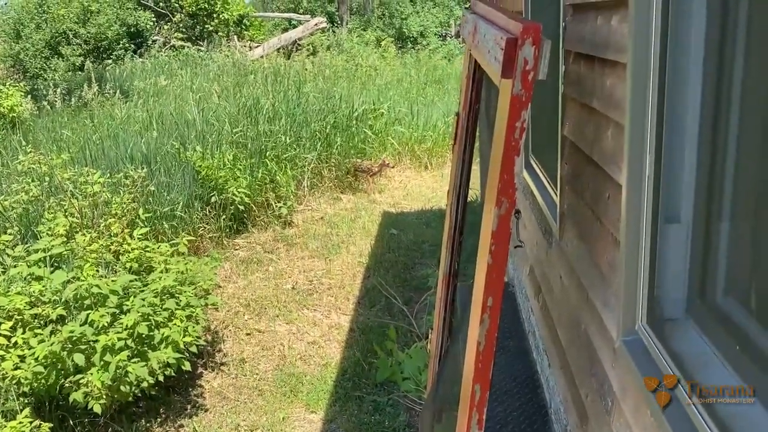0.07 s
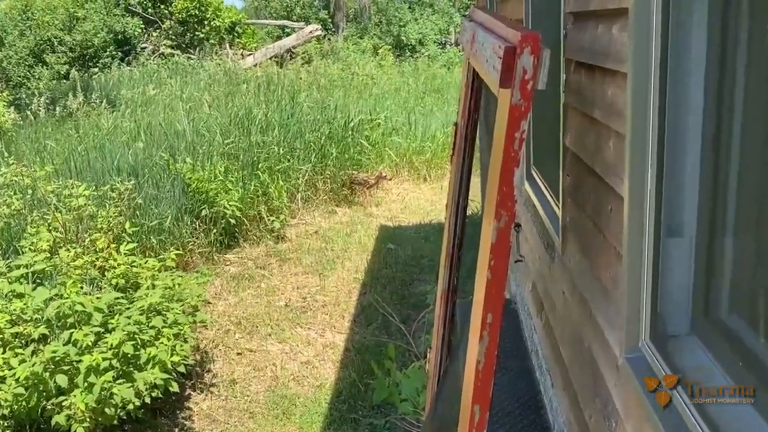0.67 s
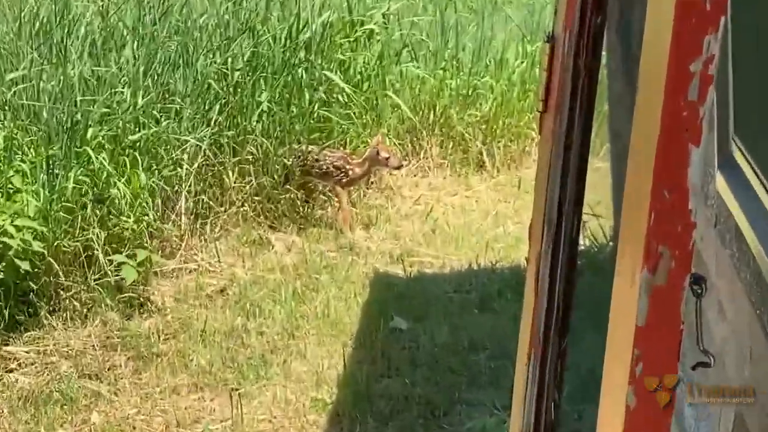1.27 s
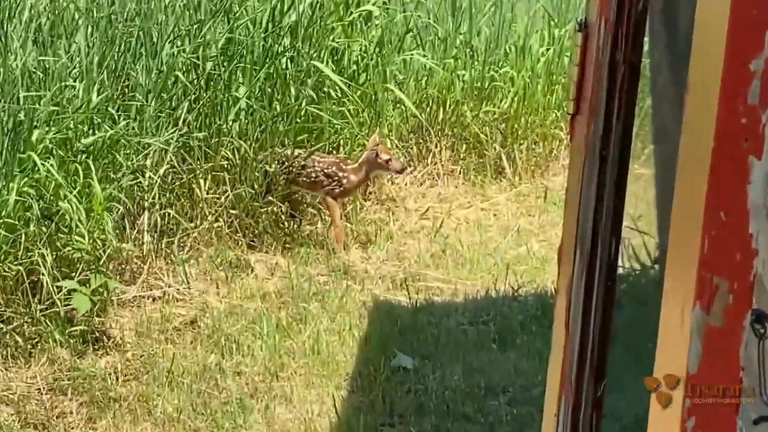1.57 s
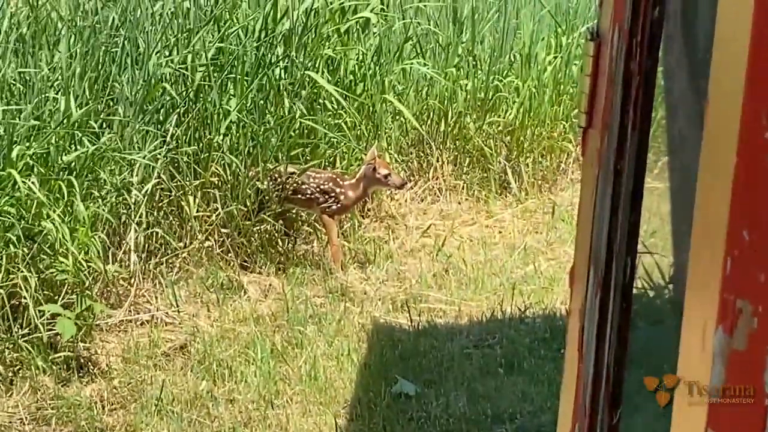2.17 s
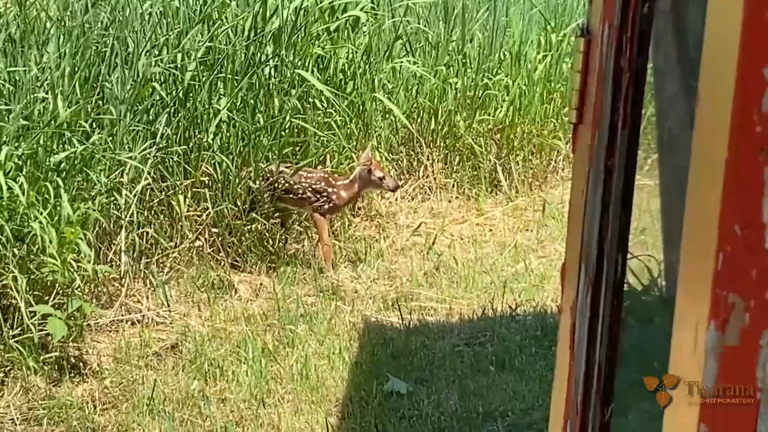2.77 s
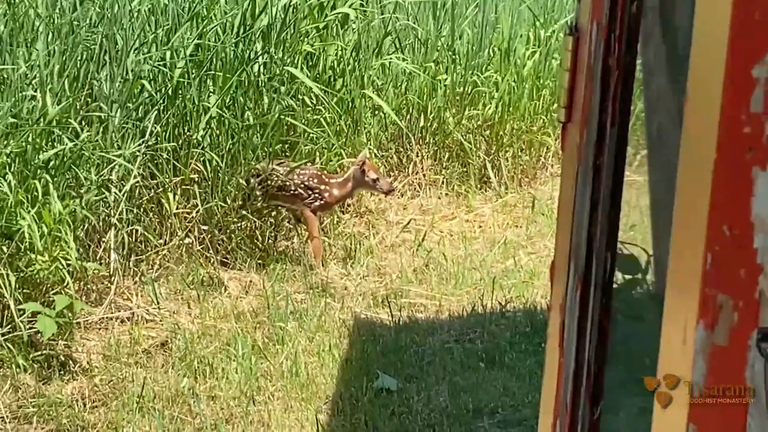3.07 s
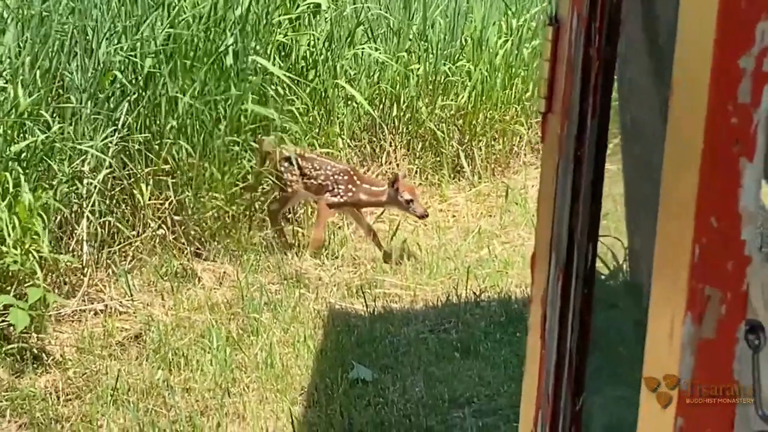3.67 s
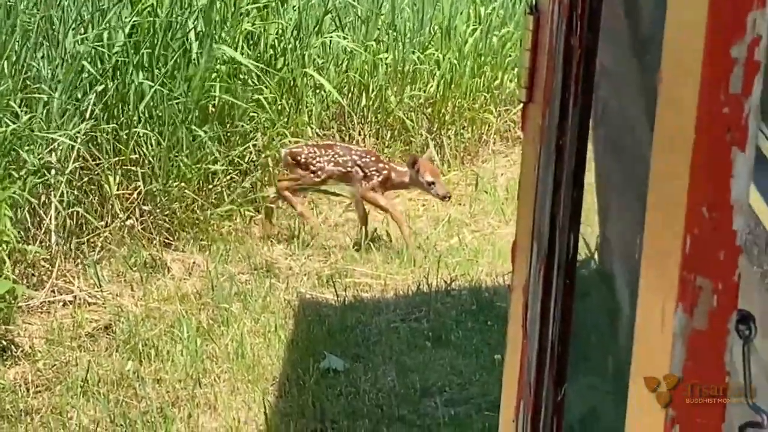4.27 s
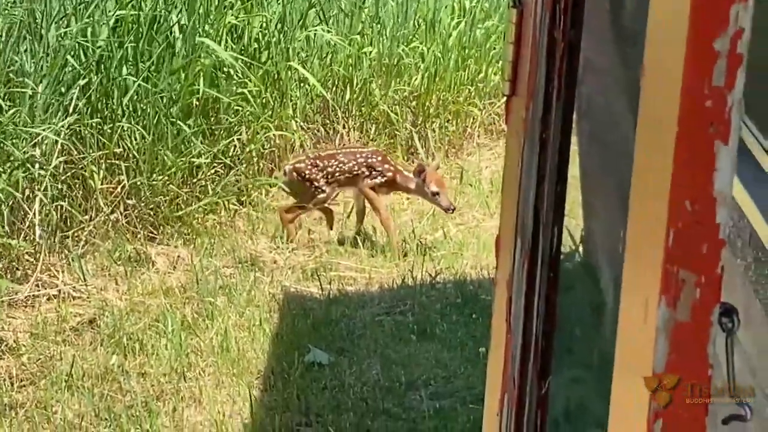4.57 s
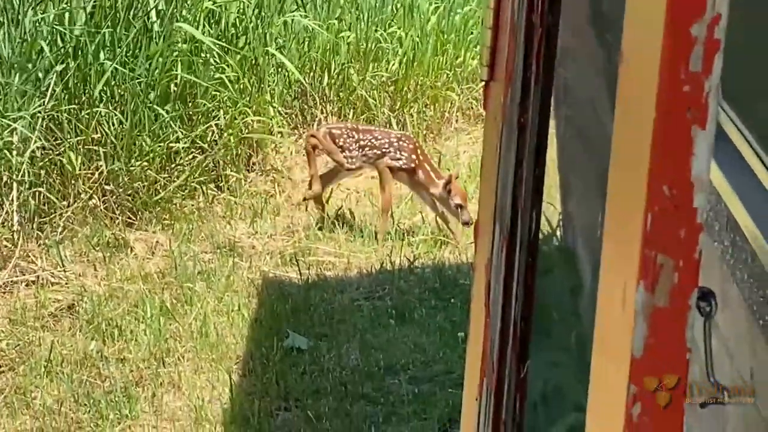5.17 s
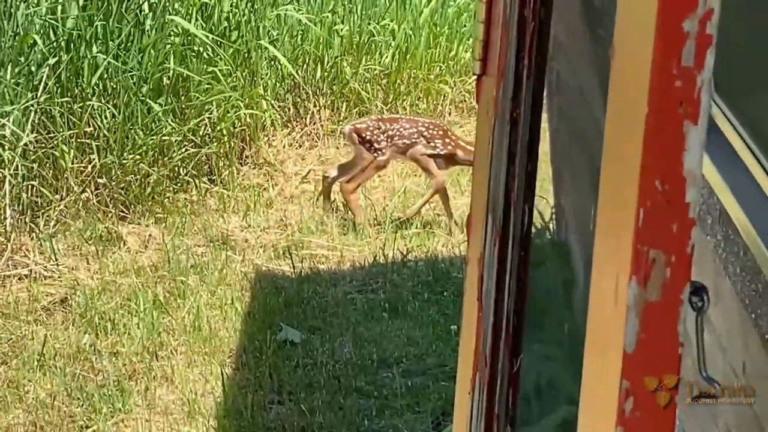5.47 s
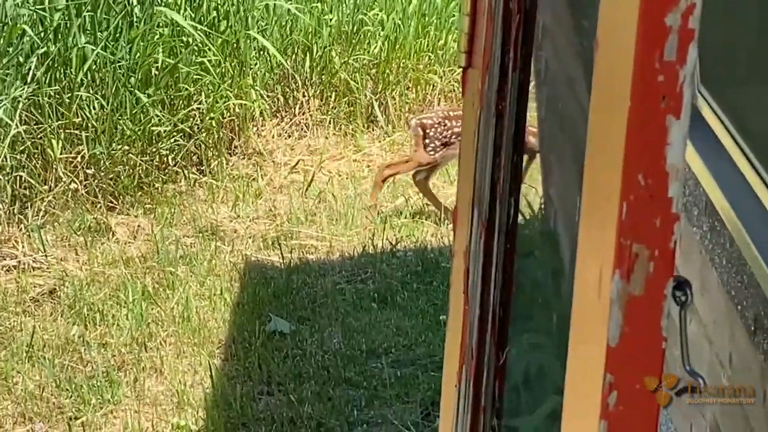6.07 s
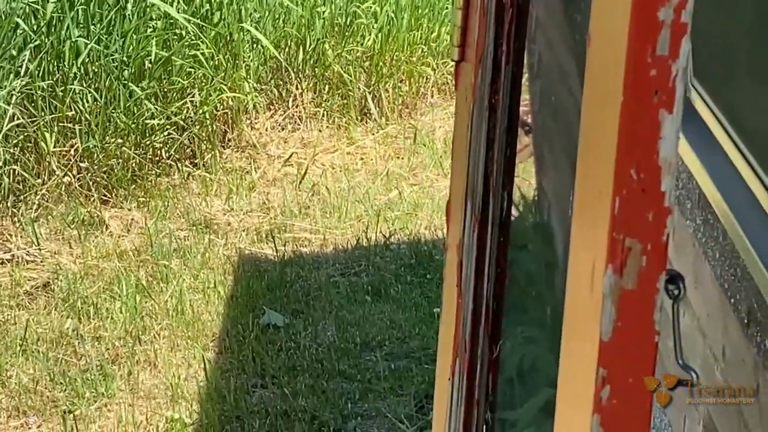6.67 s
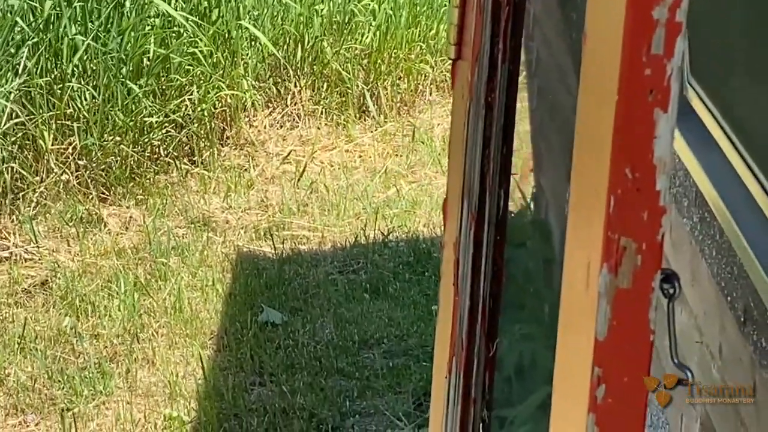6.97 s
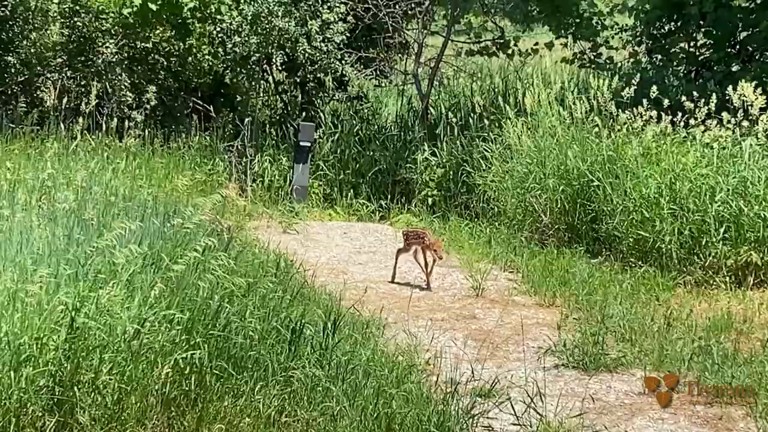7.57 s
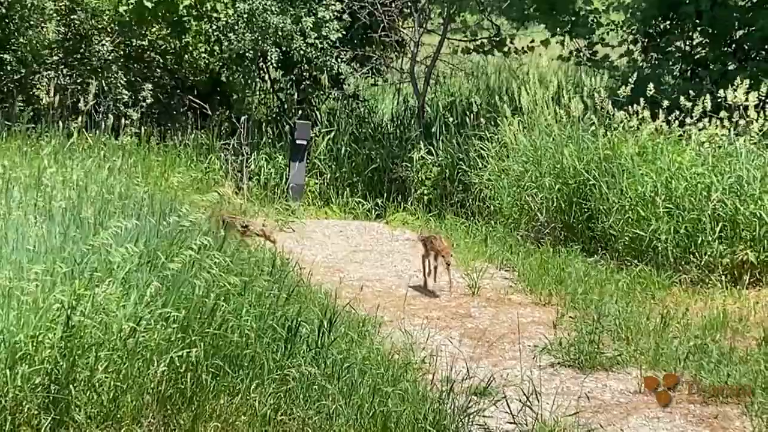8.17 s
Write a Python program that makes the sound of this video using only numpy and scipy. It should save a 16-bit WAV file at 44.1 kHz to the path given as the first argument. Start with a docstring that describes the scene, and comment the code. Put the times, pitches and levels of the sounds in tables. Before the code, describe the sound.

Quick swooping birdsong fills a meadow while light wind buffets the microphone and a fawn softly swishes through tall grass.

```python
"""A summer meadow, heard from a phone held at a house door. One small bird whistles a fast phrase of
swoops and a trill, another repeats a rise-fall-arch tune, and more call from the trees; the wall and the
leaves echo them. Light wind and handling bump the microphone, and a fawn swishes out of the tall grass.
A distant engine hums under the soft hush of open air."""
import sys
import numpy as np
from scipy import signal
from scipy.fft import rfft, irfft, next_fast_len
from scipy.io import wavfile
from scipy.ndimage import uniform_filter1d

SR = 44100
rng = np.random.default_rng(int(sys.argv[2]) if len(sys.argv) > 2 else 0)


def digitize_waveform(pressure):
    """Quantize a signal to 16-bit integers and store it at the path in sys.argv[1].

    Rows of a 2-D input are taken as channels; values are limited to [-1, 1].
    """
    field = np.atleast_2d(pressure).T
    bounded = np.clip(field, -1, 1)
    quanta = np.round(bounded * 32767).astype(np.int16)
    wavfile.write(sys.argv[1], SR, quanta)


N = 366471
TIME = np.arange(N) / SR


def undb(db):
    """Turn decibels into a number to multiply a sound by."""
    return 10 ** (np.asarray(db) / 20)


def curve(rows, t=TIME):
    """Join a table's rows with straight lines in time; gives one curve for each column after the first."""
    seconds, *columns = np.transpose(rows)
    return [np.interp(t, seconds, column) for column in columns]


def unit(x):
    """Scale a sound to an average power of 1."""
    return x / np.sqrt(np.mean(x ** 2) + 1e-18)


def add(out, start_s, sound):
    """Mix a sound in at the given time."""
    i = max(int(start_s * SR), 0)
    out[..., i:i + sound.shape[-1]] += sound[..., :max(N - i, 0)]


def wander(rate):
    """A smooth random wobble of typical size 1 that turns about `rate` times a second."""
    hold = max(int(SR / rate), 1)
    steps = np.repeat(rng.standard_normal(N // hold + 1), hold)
    return unit(uniform_filter1d(steps, hold)[:N])


def colour(x, points):
    """Set the balance of low and high tones from (Hz, dB) points, at an average power of 1."""
    hz, db = np.transpose(points)
    size = next_fast_len(N)
    f = np.fft.rfftfreq(size, 1 / SR) + 1
    gain = undb(np.interp(np.log(f), np.log(hz), db))
    return unit(irfft(rfft(x, size) * gain, size)[..., :N])


def two_mics(pair, apart_hz):
    """Two microphones close together hear low tones alike, but differ above apart_hz."""
    side = signal.sosfilt(signal.butter(1, apart_hz, "high", fs=SR, output="sos"), pair[1])
    return pair[0] + np.array([side, -side])


def swell(peak_s, db, rise_s, fall_s):
    """The power of a sound that grows to a peak and dies away."""
    t = TIME - peak_s
    width_s = np.where(t < 0, rise_s, fall_s)
    return undb(db) ** 2 * np.exp(-np.minimum((t / width_s) ** 2, 50))


def swing(hz, cycles):
    """A brief push and pull of air, in the middle of a quarter of a second."""
    t = np.arange(-SR // 8, SR // 8) / SR
    return np.exp(-(t * hz / cycles) ** 2) * np.cos(2 * np.pi * (hz * t + rng.random()))


def air():
    """The soft hush of open country, swelling slowly."""
    # Each row: time in seconds, level in dB.
    levels = [(0, -64.5), (1.5, -63.5), (3.7, -62.5), (5.5, -63), (7.5, -63), (8.31, -63)]
    # Each row: frequency in Hz, relative strength in dB.
    tone = [(20, -21), (45, -11.5), (120, 5), (220, 0), (330, -7), (600, -14), (1200, -22.5), (1700, -20.5),
            (2500, -16), (3500, -17.5), (7000, -28), (10000, -45), (15500, -49)]
    hush = colour(two_mics(rng.standard_normal((2, N)), apart_hz=640), tone)
    return hush * undb(curve(levels)[0] + 0.5 * wander(5))


def engine(waver, mic_phase):
    """A far engine's hum and fainter drones waver, fade and reach the two microphones out of step."""
    # The main hum. Each row: time in seconds, level in dB, pitch in Hz.
    hum = [(0, -56.5, 137.1), (.35, -55, 144.3), (.6, -61.5, 138.7), (1.1, -58.5, 139), (2.1, -67, 140.5),
           (3.3, -63, 139.3), (4.4, -55.5, 139), (5.2, -64.5, 140.4), (6, -82, 143.4), (7.1, -58.5, 141.9),
           (7.63, -60, 140.9)]
    # Each row: start and end in seconds, pitch in Hz, level in dB.
    drones = [(0, 7.6, 246.4, -77.5), (3.6, 6, 241.3, -70), (4.599, 6.6, 282.8, -75),
              (7.66, 8.2, 200.5, -68.5)]
    hum_db, hum_hz = curve(hum)
    tones = [(hum_hz, hum_db, TIME < hum[-1][0], mic_phase)]
    for start, end, hz, db in drones:
        on = np.clip(np.minimum(TIME - start, end - TIME) / 0.044, 0, 1)
        tones.append((hz, db, on, mic_phase / 2))
    out = 0
    for hz, db, on, shift in tones:
        phase = 2 * np.pi * np.cumsum(hz * (1 + waver * wander(22))) / SR
        loudness = np.sqrt(2) * on * undb(db + 1.5 * wander(8))
        out = out + loudness * np.sin([phase + shift, phase - shift])
    return out


def ticks():
    """Small knocks and ticks: bursts of noise, dull or bright, that die away fast."""
    # Each row: start in seconds, level in dB, centre and width of the band in Hz, fade time in seconds.
    knocks = [(0.658, -56, 400, 600, 0.015), (1.035, -58, 7000, 12000, 0.0066),
              (7.483, -58, 760, 796, 0.0075), (8.209, -69, 11100, 8000, 0.029)]
    out, t = np.zeros(N), np.arange(SR // 8) / SR
    for start, db, hz, width, fade_s in knocks:
        low = np.hypot(hz, width / 2) - width / 2
        band = signal.butter(2, [low, min(low + width, .45 * SR)], "band", fs=SR, output="sos")
        burst = unit(signal.sosfilt(band, rng.standard_normal(len(t))))
        onset = 1 - np.exp(-t * hz * 2)
        add(out, start, undb(db) * burst * onset * np.exp(-t / fade_s))
    return out


def leaves(gain_db):
    """Leaves and grass stir all round in a steady rustle."""
    # Each row: time in seconds, relative level in dB.
    levels = [(0, -82.5), (1.1, -82.5), (2.3, -77.5), (3, -77.5), (5.7, -75.5), (6.5, -78), (7.7, -78),
              (7.88, -88), (8.31, -82)]
    # Each row: frequency in Hz, relative strength in dB.
    tone = [(600, -3), (1500, -0.5), (2500, 2), (4000, 7.5), (7000, 4), (11000, 0.5), (15500, -11)]
    rustle = colour(two_mics(rng.standard_normal((2, N)), apart_hz=1500), tone)
    return rustle * undb(curve(levels)[0] + gain_db + wander(27))


def fawn_in_grass(gain_db, crackle, snaps_per_s, snap_range_db, flicker_db):
    """A fawn pushes through tall grass: blades slide in a bright hiss and snap free in tiny clicks."""
    # Each row: peak time in seconds, relative level in dB, rise and fall times in seconds.
    swishes = [(3.5, -69, 0.12, 0.058), (3.65, -67, 0.097, 0.15), (3.82, -72.5, 0.079, 0.2),
               (4.435, -64.5, 0.029, 0.021), (4.77, -75, 0.043, 0.044), (6.06, -82, 0.021, 0.021)]
    # Each row: frequency in Hz, relative strength in dB.
    tone = [(600, -12), (1500, -6.5), (2500, -1.5), (4000, 0.5), (7000, 4.5), (11000, 5), (15500, 1)]
    snapping = rng.random(N) < snaps_per_s / SR
    snap_sizes = snapping * undb(snap_range_db * np.minimum(rng.exponential(size=N), 3))
    hiss = rng.standard_normal((2, N))
    clicks = unit(snap_sizes * rng.standard_normal((2, N)))
    blades = colour(two_mics(hiss + crackle * clicks, apart_hz=1500), tone)
    movement = np.sqrt(sum(swell(*row) for row in swishes))
    return blades * movement * undb(gain_db + flicker_db * wander(45))


def wind(breeze_db, gusty_db, buffet_db, cycles, eddy_db, eddy_ratio):
    """Wind rumbles on the microphones; each buffet is a slow swing with faster, weaker swirls (eddies)."""
    # The breeze between buffets. Each row: time in seconds, relative level in dB.
    levels = [(0, -58.5), (.8, -60.5), (1.9, -38), (2.04, -67), (2.22, -51.5), (2.65, -59.5), (2.93, -48.5),
              (3.6, -50), (4.85, -39.5), (5.25, -50.5), (5.45, -38), (6.3, -43.5), (6.7, -47), (7.5, -49),
              (7.68, -70.5), (8.31, -71)]
    # Each row: frequency in Hz, relative strength in dB.
    tone = [(18, -45.5), (30, -8), (50, 6.5), (75, -0.5), (110, -4.5), (170, -18.5), (260, -33), (420, -55),
            (900, -82)]
    # The strongest puffs. Each row: peak time in seconds, relative level in dB, lowest pitch in Hz.
    buffets = [ (.872, -47.5, 63.6), (.946, -45, 58.6), (1.19, -40.5, 51.7), (1.351, -38.5, 56.5),
               (1.419, -35.5, 74), (1.566, -29.5, 69.5), (1.627, -35, 61), (1.706, -26.5, 78),
               (1.865, -32.5, 69.4), (1.906, -30, 62.5), (3.268, -47, 125), (3.834, -37, 60.4),
               (4.066, -40, 59), (4.808, -35.5, 103), (4.963, -36.5, 58), (5.358, -28.5, 79.4),
               (5.489, -36, 64.4), (5.616, -34, 74), (6.564, -32, 66), (6.924, -32.5, 54.6),
               (6.99, -30.5, 72.6), (7.323, -35, 68), (7.559, -30.5, 74.8), (7.602, -37, 134),
               (7.62, -36.5, 74)]
    gusts = np.minimum(wander(20), 0.7)  # the breeze sinks freely but rises only a little
    breeze = undb(curve(levels)[0] + breeze_db + gusty_db * gusts)
    # Each buffet also stirs up the rumble around it.
    stirred = sum(swell(peak_s, db - 8.5, rise_s=0.025, fall_s=0.03) for peak_s, db, _ in buffets)
    rumble = colour(two_mics(rng.standard_normal((2, N)), apart_hz=190), tone)
    out = rumble * np.sqrt(breeze ** 2 + stirred)
    for peak_s, db, hz in buffets:
        eddies = sum(undb(k * eddy_db) * swing(hz * eddy_ratio ** k, cycles * (1 + k / 2))
                     for k in range(3))
        add(out, peak_s - 1 / 8, undb(db + buffet_db) * eddies)
    return out


def handling_thump(peak_s, db, hz):
    """The hand bumps the phone with one dull thump."""
    out = np.zeros(N)
    add(out, peak_s - 1 / 8, undb(db) * swing(hz, cycles=0.31))
    return out


def tree_line_birds(trill_hz, pulse_db):
    """Two songs from the tree line, blurred by distance into a soft chatter and a thin trill."""
    # Each point: frequency in Hz, relative strength in dB.
    chatter_tone = [(1500, -38), (2300, -5), (2800, 0.5), (3300, -7), (4300, -7), (6000, -18)]
    trill_tone = [(4000, -48), (4450, -7), (4600, 8), (4780, -12), (5300, -52)]
    # Each point: time in seconds, level in dB.
    chatter_db, = curve([(0, -99.5), (1.5, -77), (3.9, -79), (4.12, -69.5), (4.35, -67),
                         (4.55, -66.5), (4.9, -100)])
    trill_db, = curve([(4.3, -100), (4.5, -74), (4.76, -69), (4.86, -77), (5.1, -100)])
    chatter = colour(rng.standard_normal(N), chatter_tone)
    trill = colour(rng.standard_normal(N), trill_tone)
    pulses_db = pulse_db * np.sin(2 * np.pi * trill_hz * TIME)
    return chatter * undb(chatter_db + 2.2 * wander(25)) + trill * undb(trill_db + pulses_db)


def meadow_echo(song, echo_share, scatter_db, tail_db, spread):
    """Hard echoes and quick scatter around the door, then a thin tail from leaves and stalks."""
    # Echoes from door, wall and ground. Each row: delay in seconds, relative strength.
    echoes = [(.0028, 0.43), (.0048, 0.29), (.0081, 0.63), (.011, .5), (.059, 0.047)]
    scatter_s, tail_s = 0.011, 0.34  # the tail fades by 60 dB in tail_s
    t = np.arange(SR) / SR
    scatter_fade = np.exp(-t / scatter_s)
    early = undb(scatter_db) * unit(rng.standard_normal(SR) * scatter_fade) / np.sqrt(SR)
    early[0] += 1  # the sound that comes straight from the bird
    for delay_s, strength in echoes:
        early[int(delay_s * SR)] += strength * echo_share
    mid, side = rng.standard_normal((2, SR)) * undb(-60 * t / tail_s) * (1 - scatter_fade)
    tail = np.array([mid + spread * side, mid - spread * side]) / np.linalg.norm(mid)
    response = early / np.linalg.norm(early) + tail * undb(tail_db)
    return signal.fftconvolve(song[None], response, axes=1)[:, :N]


def single_notes(song):
    """Unfold the figures of a song (short groups that a bird repeats) into single notes."""
    # Each row of a figure: delay in seconds before stretching, note or figure name, level change in dB.
    figures = { "cascade": [(0, "lisp", -1.5), (.03, "swoop", -0.5), (.178, "whistle", -2.5)],
               "stutter": [(0, "flick", -4.5), (.014, "flick", 1.5), (.029, "flick", 2.5),
               (.031, "hook", 3.5), (.096, "chip", 0)], "answer": [(0, "fall", -2), (.128, "arch", -4.5),
               (.189, "drop", 4)], "motif": [(0, "rise", -2), (.2, "answer", 5)], }
    for start, name, db, pitch, stretch in song:
        if name in figures:
            yield from single_notes([(start + delay * stretch, part, db + part_db, pitch, stretch)
                                     for delay, part, part_db in figures[name]])
        else:
            yield start, name, db, pitch, stretch


def bird(song, waver, flutter_db, overtone_db, throat_hz, off_throat_db):
    """A bird's voice box makes a gliding, trembling whistle, loudest near the pitch its throat rings at."""
    # Each note, before the song shifts and stretches it: fade-in and fade-out in seconds,
    # then its pitch path as points of time in seconds and pitch in Hz.
    shapes = { "step": (0.086, 0.043, [(0, 5800), (.02, 6000), (.04, 5230), (.06, 5330), (.105, 5324)]),
              "slur": (0.035, 0.0058, [(0, 5570), (.032, 6120), (.045, 5460), (.066, 4850), (.102, 4704)]),
              "lisp": (0.019, 0.011, [(0, 6700), (.009, 7160), (.026, 7350), (.052, 7370)]),
              "swoop": (.014, 0.012, [(0, 3710), (.006, 5400), (.014, 5790), (.054, 5695), (.076, 6740),
              (.087, 6650), (.1, 5700), (.125, 4680), (.153, 4040)]), "whistle": (0.0049, .06, [(0, 3958),
              (.025, 3880), (.085, 3830)]), "flick": (0.00081, 0.0027, [(0, 8100), (.004, 7240),
              (.011, 6150)]), "hook": (0.059, 0.0054, [(0, 4800), (.025, 5025), (.039, 5030), (.046, 4800),
              (.054, 3720)]), "chip": (.018, 0.006, [(0, 6060), (.011, 5930), (.021, 5390), (.029, 4950),
              (.035, 3540)]), "dome": (0.036, .006, [(0, 4940), (.022, 5180), (.029, 5860), (.039, 6500),
              (.058, 6620), (.078, 6170), (.097, 5820), (.105, 4610), (.112, 4100)]),
              "low": (0.013, 0.0098, [(0, 3340), (.02, 4010), (.032, 4000), (.038, 3380)]),
              "slash": (0.0063, 0.015, [(0, 7880), (.01, 7240), (.026, 5690), (.037, 5170), (.047, 4250),
              (.055, 3800)]), "flourish": (.012, 0.075, [(0, 4130), (.03, 4640), (.048, 4675), (.082, 5250),
              (.099, 5660), (.118, 7440), (.14, 7900)]), "rise": (0.0021, 0.014, [(0, 2300), (.05, 2729),
              (.072, 3150), (.088, 4000), (.102, 5580), (.116, 4850), (.127, 4550), (.138, 5440),
              (.157, 5540)]), "fall": (0.036, 0.044, [(0, 5720), (.012, 5830), (.022, 5650), (.034, 5000),
              (.047, 4450), (.06, 4080), (.085, 3810)]), "arch": (0.012, 0.039, [(0, 4220), (.016, 4230),
              (.032, 4534), (.048, 4660), (.058, 4400)]), "drop": (0.09, 0.03, [(0, 3806), (.021, 3900),
              (.03, 3646), (.036, 3270), (.045, 2520)]), "peep": (0.0075, 0.014, [(0, 3990), (.008, 3765),
              (.02, 3650), (.035, 3240)]), }
    edge_db = 15  # how much quieter a note is at its two ends
    out, tremble, flutter = np.zeros(N), wander(350), wander(160)
    for start, name, db, pitch, stretch in single_notes(song):
        fade_in, fade_out, glide = shapes[name]
        t = np.arange(int(glide[-1][0] * stretch * SR)) / SR
        hz = pitch * curve(glide, t / stretch)[0]
        here = int(start * SR) + np.arange(len(t))
        phase = 2 * np.pi * np.cumsum(hz * (1 + waver * tremble.take(here, mode="clip"))) / SR
        opening = np.clip(np.minimum(t / fade_in, (t[-1] - t) / fade_out) / stretch, 0, 1)
        level_db = db - edge_db * (1 - opening) ** 2 - off_throat_db * np.log2(hz / throat_hz) ** 2
        soft_ends = np.clip(np.minimum(t, t[-1] - t) / .001, 0, 1)  # keeps the note from clicking
        loudness = soft_ends * undb(level_db + flutter_db * flutter.take(here, mode="clip"))
        add(out, start, loudness * (np.sin(phase) + undb(overtone_db) * np.sin(2 * phase)))
    return out


def trill_notes(count, start_s, every_s, db, rise_db, sag):
    """One quick downward note repeated evenly, each time a little louder and lower."""
    return [(start_s + k * every_s, "slash", db + k * rise_db, 1 - k * sag, 1) for k in range(count)]


def songbirds():
    """Stray calls from the trees, a bird repeating its tune and a near bird warbling, all with echoes."""
    # Each row: start in seconds, note or figure name, relative level in dB, pitch factor, length factor.
    stray_calls = [(.41, "peep", -71, .84, 1), (.92, "whistle", -76, .67, 1.5),
                   (1.16, "whistle", -70, 0.54, 1.5), (7.38, "whistle", -66.5, .53, 0.86),
                   (7.565, "whistle", -66, .55, 1.1), (7.746, "peep", -61, 1.07, 1.2),
                   (7.808, "peep", -63, 0.8, .9), (7.834, "peep", -60.5, 0.72, .7),
                   (7.888, "peep", -64.5, 1.17, 0.86), (8.102, "lisp", -62.5, 0.49, 0.4),
                   (8.185, "slash", -63.5, 0.86, 1.07)]
    repeated_tune = [ (.712, "fall", -69.5, 0.92, 1.12), (.822, "whistle", -63, 1.15, 0.58),
                     (.992, "rise", -63.5, 1.03, 0.95), (1.28, "answer", -58.5, 0.96, 1.11),
                     (1.578, "rise", -56.5, 0.89, 1.03), (1.806, "answer", -53.5, .98, 0.9),
                     (2.108, "motif", -50, 0.95, 1.02), (2.618, "rise", -51, 0.97, 0.95),
                     (2.818, "fall", -51, 0.89, 1.2), (5.322, "answer", -59, 0.96, 1.02),
                     (5.62, "motif", -54, 1.02, 1.05), (6.141, "motif", -51, 1, 0.99),
                     (6.638, "motif", -45.5, 1.025, 0.99), (7.13, "rise", -41.5, 0.99, 0.962),
                     (7.328, "answer", -39.5, 1, .99)]  # two runs, each growing louder
    near_phrase = [ (1.185, "step", -50.5, 1.004, 0.88), (1.338, "slur", -44, 0.98, 1),
                   (1.52, "cascade", -39.5, 1.003, 0.98), (1.843, "cascade", -38.5, 1, 0.95),
                   (2.17, "stutter", -39.5, 1.02, 1), (2.365, "stutter", -40.5, 1, 1),
                   (2.575, "dome", -40, 1.016, 0.99), (2.692, "low", -45, 1.006, 0.88),
                   (2.792, "lisp", -47, 1, 0.47), (2.793, "dome", -40.5, 0.99, 0.93),
                   (2.887, "slash", -49.5, 1.04, 0.92), (2.91, "low", -51, 0.97, 0.74),
                   (3.405, "flourish", -46.5, 0.98, 0.97)]
    trill = trill_notes(count=5, start_s=2.97, every_s=0.0881, db=-46.5, rise_db=0.73, sag=0.0042)
    warble = bird(near_phrase + trill, waver=0.0052, flutter_db=3, overtone_db=-40.5,
                  throat_hz=4580, off_throat_db=21)
    tune = bird(repeated_tune, waver=0.01, flutter_db=4, overtone_db=-61,
                throat_hz=5590, off_throat_db=12.5)
    calls = bird(stray_calls, waver=0.012, flutter_db=1, overtone_db=-54, throat_hz=3220, off_throat_db=9)
    near = meadow_echo(warble, echo_share=0.71, scatter_db=-11, tail_db=-9, spread=0.6)
    further = meadow_echo(tune, echo_share=0.51, scatter_db=-18.5, tail_db=-11.5, spread=0.74)
    trees = meadow_echo(calls, echo_share=0.25, scatter_db=-3, tail_db=-8.5, spread=0.2)
    return near + further + trees


def scene():
    """Birds in the meadow over wind, grass and a distant hum."""
    return (songbirds()
            + wind(breeze_db=-3, gusty_db=4.5, buffet_db=4, cycles=0.69, eddy_db=-14.5, eddy_ratio=1.86)
            + handling_thump(peak_s=1.72, db=-21.5, hz=177)
            + fawn_in_grass(gain_db=9.5, crackle=0.52, snaps_per_s=700, snap_range_db=2.5, flicker_db=2.4)
            + leaves(gain_db=9)
            + tree_line_birds(trill_hz=17, pulse_db=3)
            + air()
            + ticks()
            + engine(waver=0.0082, mic_phase=0.75))


def record(dry):
    """The phone reshapes left and right and cuts the highest treble; the level dips once, briefly."""
    # The dip. Each row: time in seconds, level change in dB.
    dip = [(7.636, 0), (7.642, -35), (7.659, -35), (7.664, 0)]
    merge_hz, top_hz = 1780, 15750
    turn_from_hz, full_turn_hz, knee_hz = 6950, 4300, 300
    size = next_fast_len(N)
    f = np.fft.rfftfreq(size, 1 / SR)
    left, right = rfft(dry, size)
    mid = (left + right) / 2
    side = (left - right) / 2 / np.hypot(1, (f / merge_hz) ** 3)  # left and right merge in the treble
    # Higher still, they turn steadily out of step as the frequency rises.
    above_hz = knee_hz * np.logaddexp(0, (f - turn_from_hz) / knee_hz)
    turn = np.exp(1j * np.pi * above_hz / full_turn_hz)
    stereo = irfft(np.array([(mid + side) / turn, (mid - side) * turn]), size)[:, :N]
    treble_cut = signal.ellip(10, .2, 70, top_hz, fs=SR, output="sos")
    return signal.sosfilt(treble_cut, stereo * undb(curve(dip)[0]))


dry = scene()
out = record(dry)
digitize_waveform(out)
```